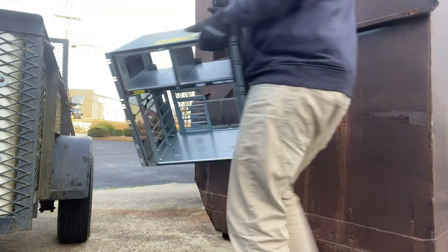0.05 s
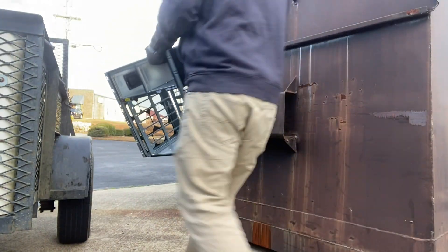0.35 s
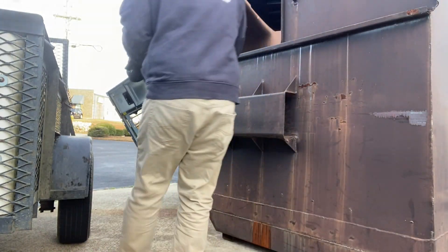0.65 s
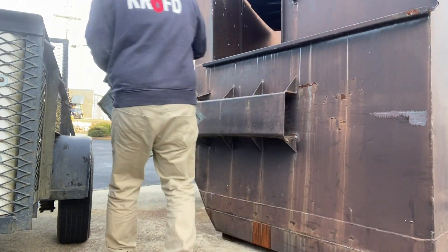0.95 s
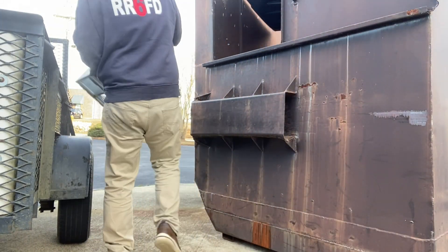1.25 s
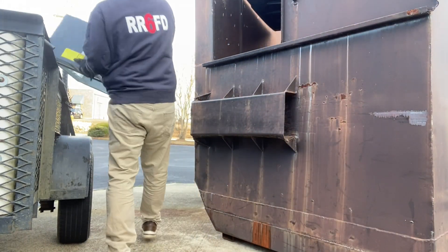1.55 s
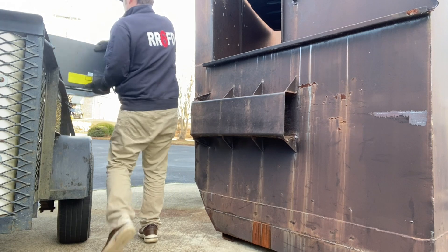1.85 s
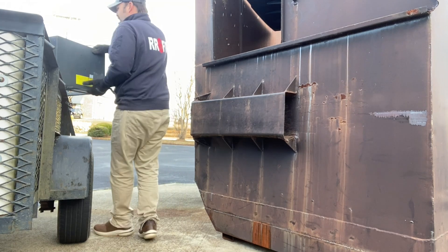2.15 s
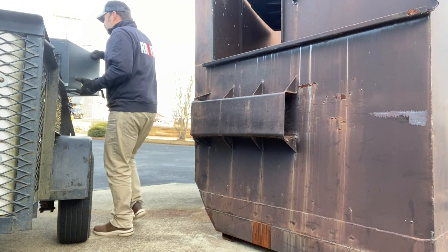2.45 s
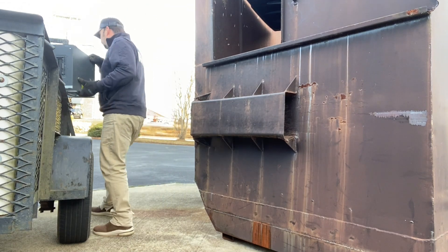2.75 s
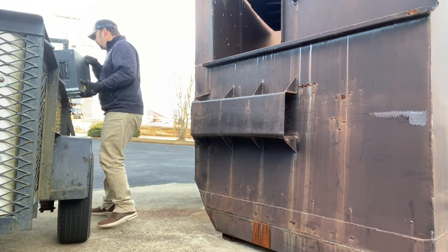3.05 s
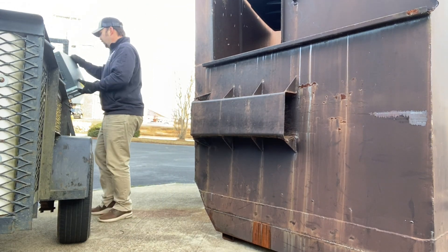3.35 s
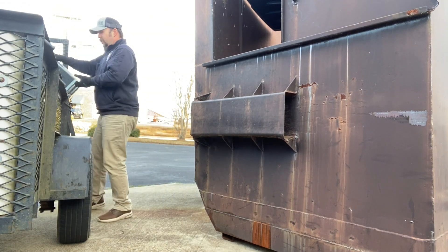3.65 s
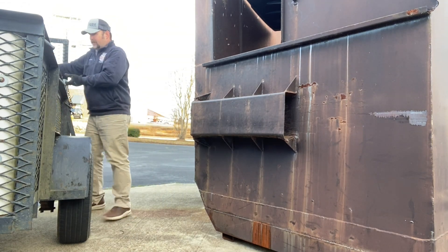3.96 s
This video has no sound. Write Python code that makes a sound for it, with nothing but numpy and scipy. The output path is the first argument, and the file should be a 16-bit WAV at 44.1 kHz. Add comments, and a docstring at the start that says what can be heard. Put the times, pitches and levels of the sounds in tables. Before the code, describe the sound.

A sheet-metal case bangs into a steel trailer, clinks and scrapes, with distant traffic behind.

```python
"""An open yard: an eight-cylinder engine idles over the broadband wash of distant traffic.
After a soft footfall, an empty sheet-metal case is swung against a steel trailer. It crashes and
bounces, the impacts exciting the bending modes of the panels, and its stiff frame clinks twice.
The case is then shoved along the trailer: stick-slip friction makes it groan while its edge rasps."""
import sys
import numpy as np
from scipy import signal
from scipy.fft import rfft, irfft
from scipy.io import wavfile
from scipy.ndimage import uniform_filter1d, minimum_filter1d

SR = 44100
rng = np.random.default_rng(int(sys.argv[2]) if len(sys.argv) > 2 else 0)


def unload_wav(signal):
    """Save mono or channel-first audio to the path in sys.argv[1] as 16-bit WAV at rate SR, clipped to [-1, 1]."""
    wavfile.write(
        sys.argv[1],
        SR,
        np.round(np.clip(np.atleast_2d(signal).T, -1, 1) * 32767).astype(np.int16),
    )


N = 176400
T = np.arange(N) / SR


def from_db(db):
    """Amplitude ratio: a factor of ten per 20 dB."""
    return 10 ** (np.asarray(db) / 20)


def unit_rms(x):
    """Power normalisation to an rms of 1."""
    return x / np.sqrt(np.mean(x ** 2) + 1e-20)


def unit_energy(x):
    """Energy normalisation: the response passes white noise at unchanged power."""
    return unit_rms(x) / np.sqrt(x.shape[-1])


def in_time(rows):
    """Linear interpolation of each column at every sample."""
    times, *columns = np.transpose(rows)
    return [np.interp(T, times, column) for column in columns]


def at_hz(points, hz):
    """Interpolation on a log-frequency axis."""
    freqs, values = np.transpose(points)
    return np.interp(np.log(np.maximum(hz, 1)), np.log(freqs), values)


def drift(corner_hz):
    """Low-passed noise: a slow random fluctuation of rms 1."""
    hop, settle = 100, 1000
    pole = np.exp(-2 * np.pi * hop * corner_hz / SR)
    noise = rng.standard_normal(N // hop + settle + 2)
    slow = signal.lfilter([1], [1, -2 * pole, pole * pole], noise)[settle:]
    return np.interp(np.arange(N) / hop, np.arange(len(slow)), unit_rms(slow))


def through(x, response):
    """Convolution with a stereo impulse response."""
    return signal.fftconvolve(np.atleast_2d(x), response, axes=-1)[:, :N]


def colour(spectrum, balance, size=4096):
    """Minimum-phase filter pair, by cepstral folding; balance is first minus second channel in dB."""
    hz = np.arange(size // 2 + 1) * SR / size
    db = at_hz(spectrum, hz) + at_hz(balance, hz) * np.array([[.5], [-.5]])
    cepstrum = irfft(np.log(from_db(db)))
    cepstrum[:, 1:size // 2] *= 2
    cepstrum[:, size // 2 + 1:] = 0
    return unit_energy(irfft(np.exp(rfft(cepstrum))))


def modes(rows, seconds=.5):
    """Modal superposition: damped sinusoids (Hz, dB, T60), each with its own phase at each ear."""
    t = T[:int(seconds * SR)]
    phases = rng.uniform(0, 2 * np.pi, (len(rows), 2, 1))
    out = np.zeros((2, len(t)))
    for (hz, db, t60), phase in zip(rows, phases):
        out += from_db(db) * np.exp(-np.log(1000) * t / t60) * np.sin(2 * np.pi * hz * t + phase)
    return unit_energy(out)


def diffuse(t60, correlation=.3):
    """Modal overlap: dense modes and near reflections merge into exponentially decaying noise."""
    t = T[:SR // 2]
    mid, side = rng.standard_normal((2, len(t)))
    ears = np.sqrt(1 + correlation) * mid + np.sqrt(1 - correlation) * side * [[1], [-1]]
    return unit_energy(ears * np.exp(-np.log(1000) * t / t60))


def contacts(per_s, spread_db=3):
    """Poisson process: small impacts of uneven size at random instants."""
    sizes = from_db(spread_db * np.minimum(rng.exponential(1, N), 4)) * rng.choice([-1, 1], N)
    return unit_rms(sizes * (rng.random(N) < per_s / SR))


def chatter(events, rise_s=.00055):
    """Contact chatter: each event's force is a run of impacts that builds fast and dies exponentially."""
    train, force = contacts(per_s=2300), np.zeros(N)
    for time, db, decay in events:
        start = int(time * SR)
        t = T[:N - start]
        run = train[start:] * np.exp(-t / decay) * (1 - np.exp(-t / rise_s))
        force[start:] += from_db(db) * unit_energy(run) * np.sqrt(decay * SR / 2)
    return force


# Interaural level difference of the contact sounds: (frequency [Hz], left minus right [dB])
CONTACT_BALANCE = [(150, -24), (320, 10), (550, 2.5), (960, 3.5), (2500, 0.4), (5000, 13.5), (9000, -7.5)]
def radiate(force, body, spectrum):
    """Source-filter model: a force drives a body, whose radiation is shaped by the spectrum."""
    response = through(body, colour(spectrum, CONTACT_BALANCE))
    return through(force, unit_energy(response))


# Spectrum of the traffic: (frequency [Hz], relative density [dB])
TRAFFIC_SPECTRUM = [(25, -8), (60, -11), (130, 18.5), (200, 12.5), (300, -1.5), (950, -1.5), (1300, -9.5),
                    (1650, -5), (2200, -13.5), (3200, -17), (4000, -26.5), (7000, -35.5), (9500, -52.5),
                    (14000, -62)]
# Its stereo width: (frequency [Hz], side minus mid [dB])
TRAFFIC_SPREAD = [(60, -0.5), (100, -3), (180, -3.5), (320, -2), (550, 4), (960, 7), (1670, -1.5),
                  (2900, -2.5), (5050, -3.5), (8790, 2.5)]
def traffic(level_db=-35, flutter_db=1.18, pan_db=1.42, whine_hz=12050, whine_db=-86):
    """Incoherent summation: far vehicles merge into wavering noise; a faint high whine lies on top."""
    mid_side_filter = colour(TRAFFIC_SPECTRUM, TRAFFIC_SPREAD)[::-1]
    mid, side = through(rng.standard_normal((2, N)), mid_side_filter)
    wash = unit_rms(np.array([mid + side, mid - side])) * from_db([[pan_db], [-pan_db]])
    whine = np.sqrt(2) * from_db(whine_db) * np.sin(2 * np.pi * whine_hz * T)
    return wash * from_db(level_db + flutter_db * drift(corner_hz=12)) + whine


# Strongest exhaust line, order 16, at twice the firing rate: (time [s], frequency [Hz])
IDLE_PITCH = [(0, 93.8), (.85, 93.46), (1.2, 91.96), (2.3, 92.25), (4, 91.15)]
# Exhaust harmonics: (order [multiple of the cycle rate], relative level [dB])
EXHAUST_ORDERS = [(7, -33), (8, -11), (9, -33), (10, -26), (11, -31), (12, -27), (13, -15), (14, -11),
                  (15, -17), (16, 0), (17, -18), (18, -18), (19, -24), (21, -24), (22, -26), (23, -29),
                  (24, -11), (25, -20), (26, -28), (28, -23), (34, -30), (35, -36)]
# The hum dips briefly under the crash: (time [s], gain [dB])
HUM_GAIN = [(1.81, -3), (1.85, -10.5), (2.05, -10), (2.14, -8.5), (2.19, -2)]
def engine(gain_db=-15, pan_db=1, ear_lag_s=.0015):
    """Periodic exhaust pulses give a line at every eighth order; uneven firing adds sideband pairs."""
    cycle_phase = 2 * np.pi * np.cumsum(in_time(IDLE_PITCH)[0]) / 16 / SR
    sideband_phases = rng.uniform(0, 2 * np.pi, size=5)
    hum = np.zeros(N)
    for order, db in EXHAUST_ORDERS:
        offset = (order + 4) % 8 - 4  # orders from the nearest firing line
        phase = np.pi / 2 + np.sign(offset) * sideband_phases[abs(offset)] if offset else 0
        wobble = .15 if offset else .03  # depth in both amplitude and phase
        amplitude = from_db(db) * (1 + wobble * drift(corner_hz=2))
        hum += amplitude * np.sin(order * cycle_phase + phase + wobble * drift(corner_hz=2))
    hum *= np.sqrt(2) * from_db(gain_db + in_time(HUM_GAIN)[0])
    delayed = np.interp(T - ear_lag_s, T, hum)
    return np.array([hum * from_db(pan_db), delayed * from_db(-pan_db)])


# Contact of the shoe: (time [s], level [dB], decay [s])
SHOE_CONTACTS = [(.718, -46, 0.017)]
# Its spectrum: (frequency [Hz], relative density [dB])
SHOE_SPECTRUM = [(150, -8), (500, -11.5), (850, 10.5), (1400, -4), (4000, -41.5)]
def footfall():
    """Heavily damped impact: a shoe lands softly on concrete."""
    return radiate(chatter(SHOE_CONTACTS), diffuse(t60=.04), SHOE_SPECTRUM)


# Contacts of grit and metal: (time [s], level [dB], decay [s])
GRIT_CONTACTS = [(.822, -54, 0.0045), (.942, -49.5, .003), (.968, -55.5, .003), (3.188, -31.5, 0.001),
                 (3.855, -41, 0.00088)]
# Their spectrum: (frequency [Hz], relative density [dB])
GRIT_SPECTRUM = [(900, -21), (1800, 0.5), (3000, -19.5), (6000, -2.5), (8000, -18), (12000, -33)]
def ticks():
    """Short contact time means wide bandwidth: grit and metal tick sharply."""
    return radiate(chatter(GRIT_CONTACTS), diffuse(t60=.01), GRIT_SPECTRUM)


# Catches of the case's edge: (time [s], level [dB], decay [s])
EDGE_CATCHES = [(2.738, -33, 0.034), (2.857, -37.5, 0.06), (2.917, -35.5, .05), (2.968, -38.5, 0.024),
                (3.025, -60, .025), (3.183, -35.5, 0.014), (3.425, -44, 0.019), (3.83, -44, 0.049),
                (3.92, -43, 0.039)]
# Their spectrum: (frequency [Hz], relative density [dB])
RASP_SPECTRUM = [(500, -20.5), (1200, 8.5), (2600, 1.5), (4000, -11.5), (6000, -12.5), (8000, -20.5),
                 (10000, -43), (14000, -47)]
def rasps():
    """Roughness noise: the sliding edge catches in runs of tiny impacts."""
    return radiate(chatter(EDGE_CATCHES), diffuse(t60=.06), RASP_SPECTRUM)


# Modes of the case pressed against the trailer: (frequency [Hz], relative level [dB], T60 [s])
PRESSED_MODES = [(192.5, -9, 0.19), (238.5, 3, 0.15), (301.2, 3.5, 0.089), (354.7, -4.5, 0.15),
                 (416, -0.5, 0.096), (577.6, -0.5, 0.12), (723.5, -0.5, 0.25), (855, 2, 0.058),
                 (971, -1, 0.11), (1160, -7.5, 0.12), (1262, -3, 0.09), (1367, -5.5, 0.22),
                 (1530, -7, 0.34), (1750, 2, 0.05)]
# Strength of the friction: (time [s], groan gain [dB], midrange gain [dB])
SHOVE_GAINS = [(2.05, -57, -25), (2.168, -42, -34.5), (2.35, -52, -43.5), (2.6, -47.5, -43.5),
               (2.77, -28, -36.5), (2.889, -29.5, -33.5), (2.95, -28.5, -28), (3.03, -27, -28),
               (3.09, -33.5, -33), (3.16, -27.5, -28), (3.26, -26.5, -28.5), (3.34, -30.5, -35.5),
               (3.42, -37, -42), (3.51, -28.5, -31), (3.59, -34, -42.5), (3.69, -29, -30.5),
               (3.78, -27, -36), (3.86, -32, -37.5), (3.93, -30, -33), (4, -36.5, -43.5)]
# Spectra of the low groan and the midrange: (frequency [Hz], relative density [dB])
GROAN_SPECTRUM = [(90, -22), (190, -3), (250, -3), (310, 2), (420, 0), (600, -12), (1000, -30), (4000, -70),
                  (9000, -95)]
MIDRANGE_SPECTRUM = [(300, -9), (560, -1.5), (780, -1), (1020, 1.5), (1350, -5.5), (1900, -9), (3000, -16),
                     (4200, -29), (7000, -33.5), (10000, -61.5)]
def shove(spots=3, slips_per_s=500, modal_db=-5, diffuse_db=3.5):
    """Stick-slip friction drives the damped panels; the timbre shifts as the contact spot moves."""
    shares = np.array([np.exp(drift(corner_hz=2.5)) for _ in range(spots)])
    shares /= np.sqrt((shares ** 2).sum(axis=0))  # constant total power
    slide = 0
    for share in shares:
        body = from_db(modal_db) * modes(PRESSED_MODES)
        body += from_db(diffuse_db) * diffuse(t60=.2, correlation=-.1)
        for db, spectrum in zip(in_time(SHOVE_GAINS), (GROAN_SPECTRUM, MIDRANGE_SPECTRUM)):
            slide += share * from_db(db) * radiate(contacts(slips_per_s), body, spectrum)
    onset = np.interp(T, [SHOVE_GAINS[0][0], SHOVE_GAINS[1][0]], [0, 1])
    return slide * onset


# Modes of the frame: (frequency [Hz], relative level [dB])
FRAME_MODES = [(1450, -5), (1787, -6.5), (2200, 7.5), (2536, -4), (2720, -3.5), (3100, -8), (3790, 2),
               (4660, 2), (4942, -7), (5222, 5.5), (5660, 0), (6277, -9), (6700, 2.5), (7050, 4)]
# Its taps: (time [s], level [dB], decay [s], spectrum as (frequency [Hz], relative density [dB]))
FRAME_TAPS = [(2.304, -21, 0.0065, [(900, -36), (1700, -12), (2300, -7), (2800, -10), (3700, -24),
              (4600, -21), (7200, -23.5), (9000, -39), (14000, -72)]), (2.3833, -4.5, 0.0025, [(700, -30),
              (1300, -6.5), (1750, 3.5), (2300, -12), (3100, 5.5), (4000, -11.5), (5100, -10),
              (6200, -11.5), (6900, -10.5), (8000, -17.5), (10000, -42), (14000, -45)])]
def clinks(modal_db=-8, modal_t60=.13):
    """Free vibration: the stiff frame taps the trailer's rail twice and rings in its high modes."""
    frame = diffuse(t60=.15)
    frame += from_db(modal_db) * modes([(hz, db, modal_t60) for hz, db in FRAME_MODES])
    return sum(radiate(chatter([tap]), frame, spectrum) for *tap, spectrum in FRAME_TAPS)


# Strongest panel modes: (frequency [Hz], relative level [dB], T60 [s])
PANEL_MODES = [(231, -5, 1.2), (297, 0, 0.45), (347, 1.5, 0.66), (412, 6, 0.43), (451, -2.5, 1.7),
               (630, -2, 2.7), (692, -3, 1.1), (840, -2, 0.8), (970, -11, 0.71), (1080, 3, 0.65),
               (1385, 0, .9), (1490, -2, 1.0)]
# Damping of the weaker modes: (frequency [Hz], nominal T60 [s])
PANEL_DAMPING = [(150, 3.6), (1000, 0.65), (3000, 1.24), (9000, 0.28)]
def panels(count=640, low_hz=150, high_hz=10000, strong_boost_db=6.5):
    """Bending modes of thin steel plates: a few strong ones stand in a dense crowd of weaker ones."""
    position = (np.arange(count) + rng.random(count)) / count
    hz = np.interp(position, [0, 1], np.sqrt([low_hz, high_hz])) ** 2
    db = 5 * np.log10(hz / 1000) + rng.normal(0, .5, count)  # the tilt offsets the widening spacing
    t60 = at_hz(PANEL_DAMPING, hz) * rng.uniform(.91, 1.26, count)
    crowd = np.column_stack([hz, db, t60])
    strong = np.array(PANEL_MODES) + [0, strong_boost_db, 0]
    return modes(np.vstack([crowd, strong]), seconds=1)


# Blows of the case, and the thump of the trailer's side: (time [s], level [dB], decay [s])
CASE_BLOWS = [(1.798, -4.5, 0.0081), (1.816, -19, 0.014), (1.842, -18.5, 0.02), (1.89, -30.5, 0.032),
              (1.948, -25, 0.0085), (1.961, -27, .02), (2.015, -36, 0.056), (2.1, -42.5, 0.02)]
SIDE_THUMPS = [(1.813, -7, 0.0074)]
# Spectra of clatter, ringing and thump: (frequency [Hz], relative density [dB])
CLATTER_SPECTRUM = [(60, -14), (180, -6), (400, 3.5), (650, -8.5), (950, 3.5), (1700, -2), (3000, -7),
                    (4000, -19), (5200, -19), (7800, -25), (9500, -44), (11000, -66), (14000, -36)]
RING_SPECTRUM = [(60, -26), (180, 9.5), (400, 4), (950, 5.5), (1700, 1.5), (2800, -7.5), (4000, -19.5),
                 (7000, -19), (9000, -45), (11000, -68)]
THUMP_SPECTRUM = [(50, 5), (120, 6.5), (210, 7), (290, -10), (390, -1), (560, -24), (1500, -59)]
# Modes of the trailer's side: (frequency [Hz], relative level [dB], T60 [s])
TRAILER_MODES = [(202.5, 2, 0.57), (350, -6, 0.17), (396, 0, .22), (580, 4, 0.28), (650, -10, 0.19),
                 (844, -4, 0.15)]
def crash(spots=3, clatter_db=7, ring_db=1.5, boom_db=-5.5):
    """Impact excitation: the case hits at several spots and bounces; panels ring, the trailer booms."""
    body, trailer_side = panels(), modes(TRAILER_MODES)
    out = 0
    for _ in range(spots):
        blows, thump = chatter(CASE_BLOWS), chatter(SIDE_THUMPS)
        clatter = radiate(blows, diffuse(t60=.14, correlation=-.077), CLATTER_SPECTRUM)
        ring = radiate(blows, body, RING_SPECTRUM)
        thud = radiate(thump, diffuse(t60=.24), THUMP_SPECTRUM)
        boom = through(thump, trailer_side)
        out += from_db(clatter_db) * clatter + from_db(ring_db) * ring + thud + from_db(boom_db) * boom
    return out / np.sqrt(spots)  # independent spots add in power


def scene():
    """Linear superposition of the case, the trailer and the yard's background."""
    return crash() + clinks() + shove() + rasps() + ticks() + footfall() + engine() + traffic()


def record(dry):
    """Peak limiting and band limiting: a fast gain dip holds the peaks, a low-pass cuts the top."""
    ceiling, window_samples, cutoff_hz = .95, 201, 14500
    gain = ceiling / np.maximum(np.abs(dry).max(axis=0), ceiling)
    gain = uniform_filter1d(minimum_filter1d(gain, window_samples), window_samples)
    fade_in = np.minimum(T / .004, 1)
    lowpass = signal.cheby2(12, 70, cutoff_hz, fs=SR, output="sos")
    return signal.sosfilt(lowpass, dry * gain * fade_in)


dry = scene()
out = record(dry)
unload_wav(out)
```